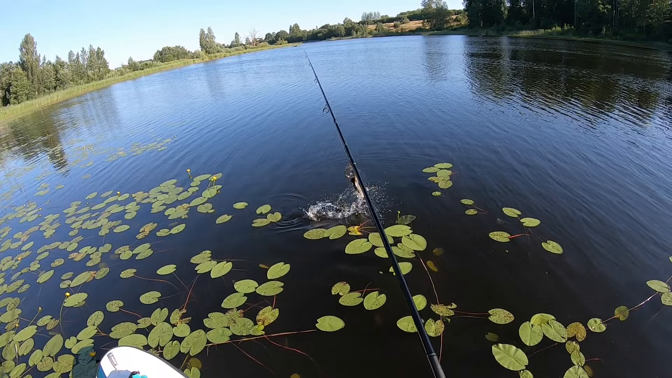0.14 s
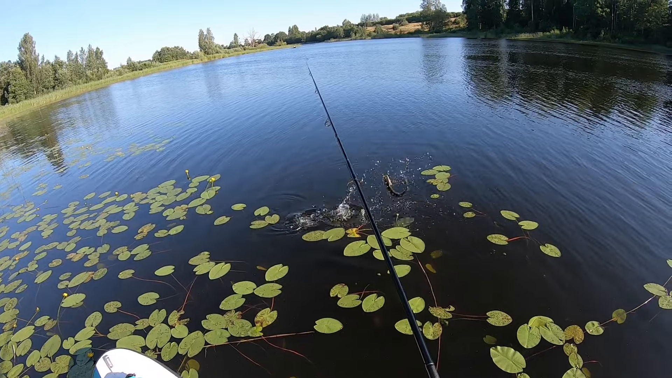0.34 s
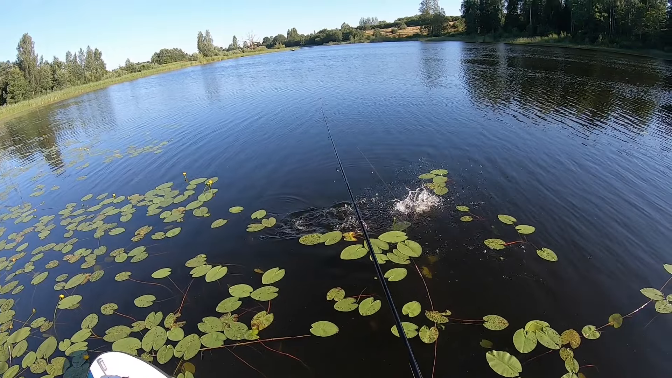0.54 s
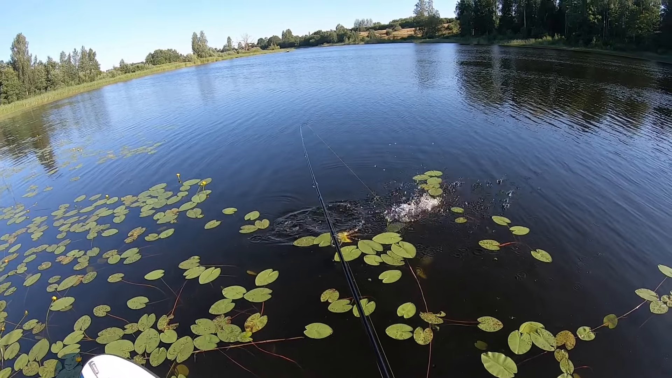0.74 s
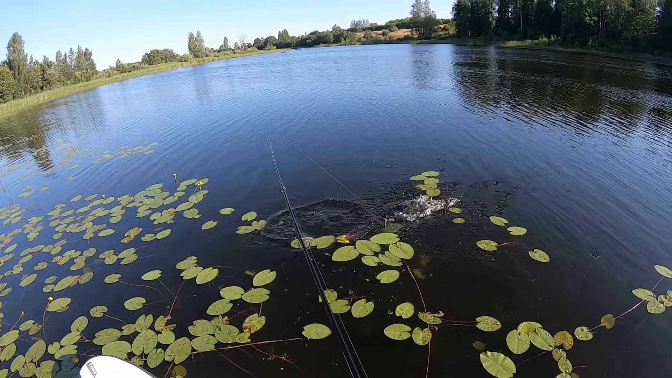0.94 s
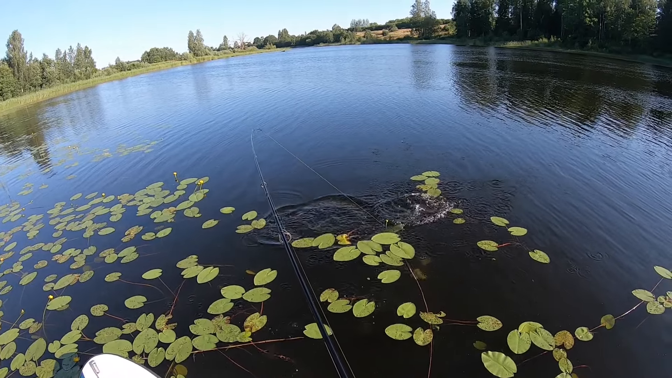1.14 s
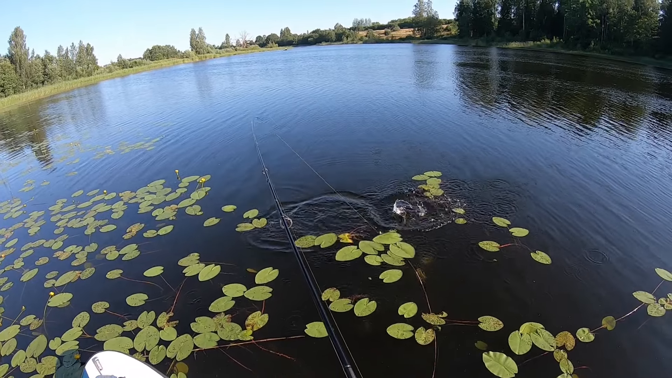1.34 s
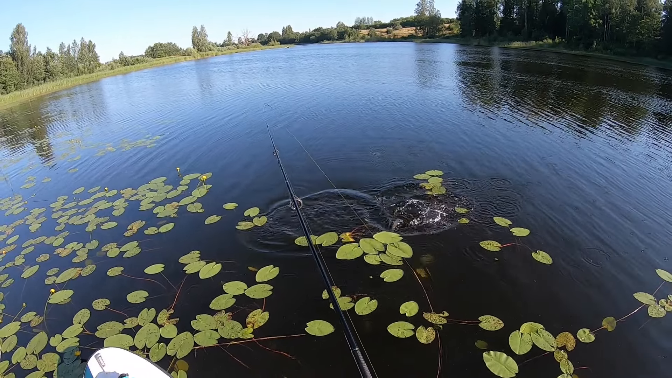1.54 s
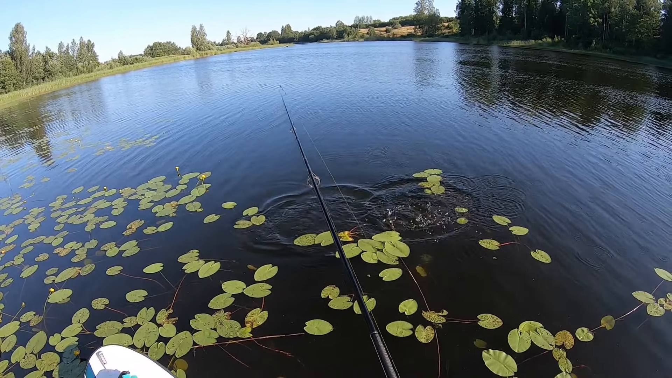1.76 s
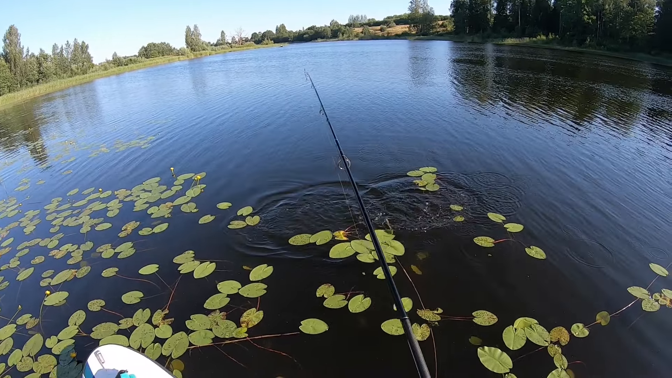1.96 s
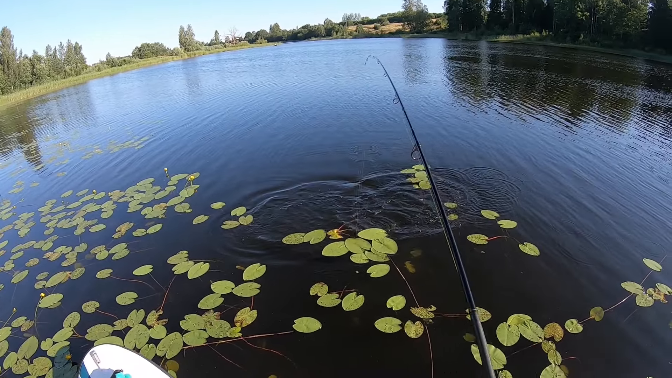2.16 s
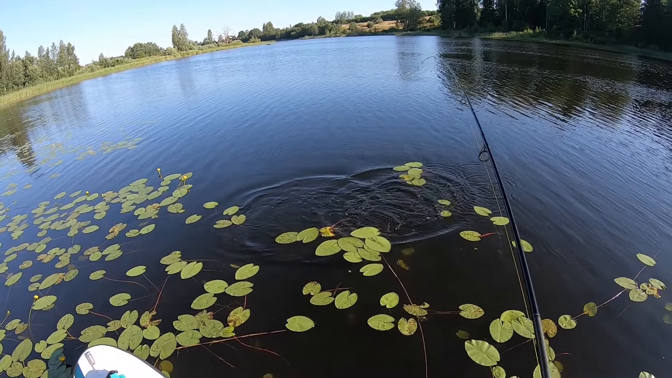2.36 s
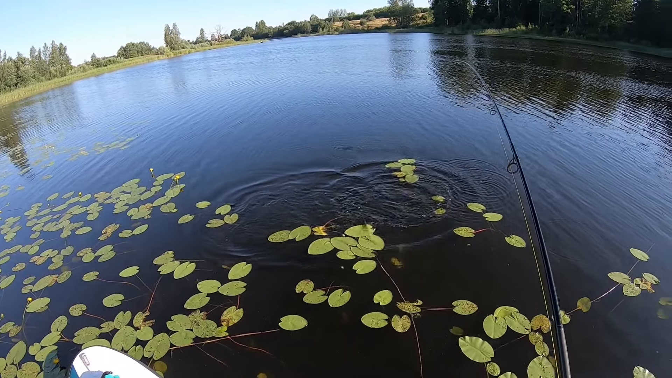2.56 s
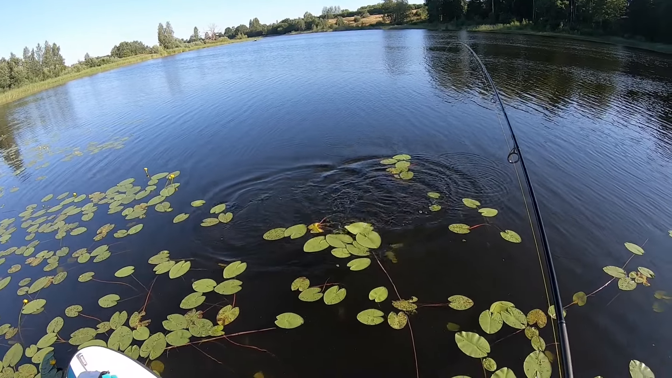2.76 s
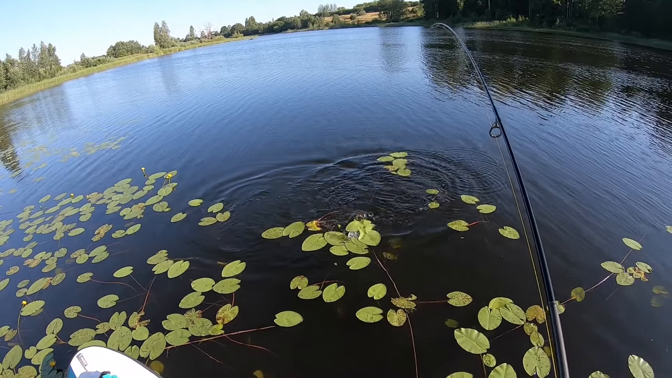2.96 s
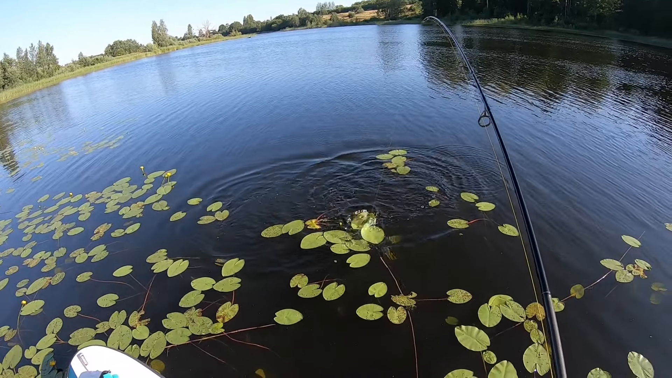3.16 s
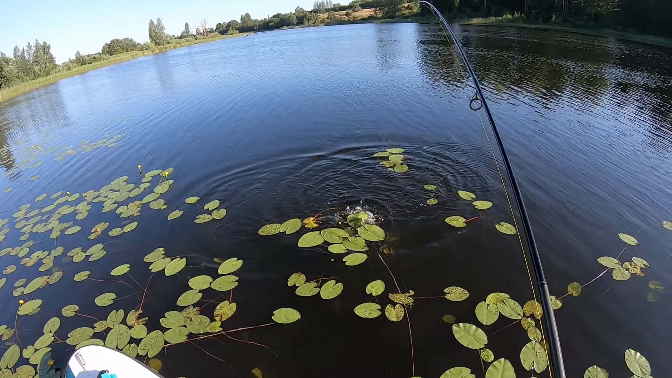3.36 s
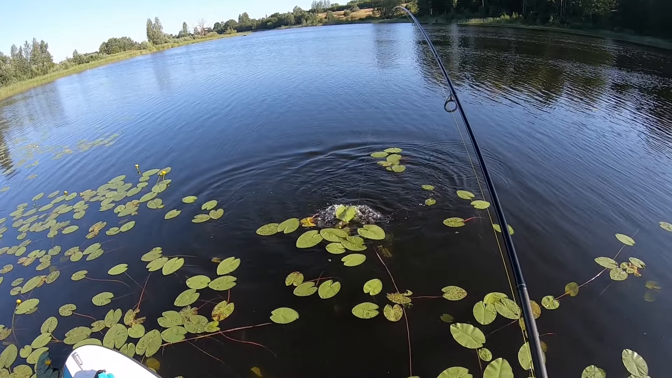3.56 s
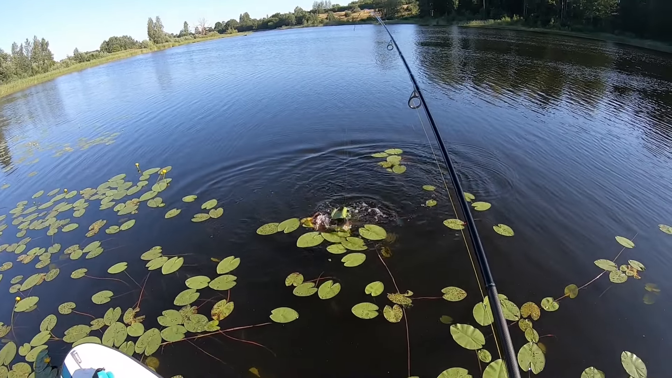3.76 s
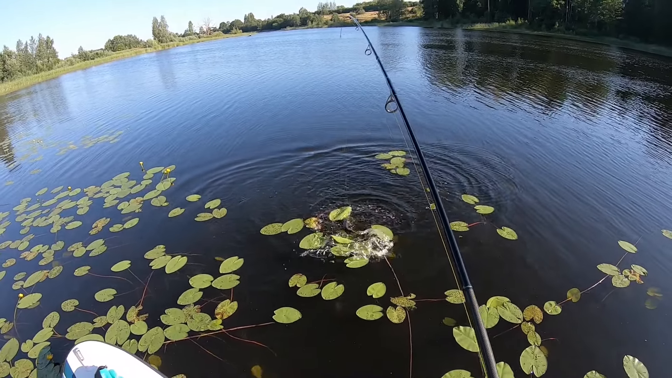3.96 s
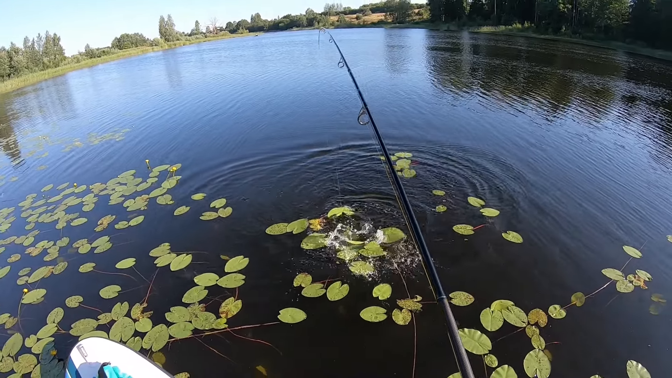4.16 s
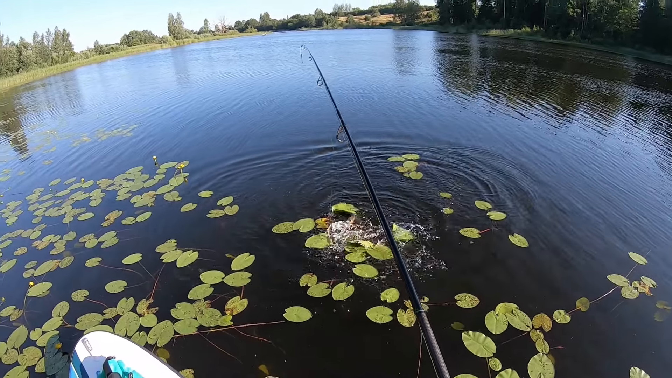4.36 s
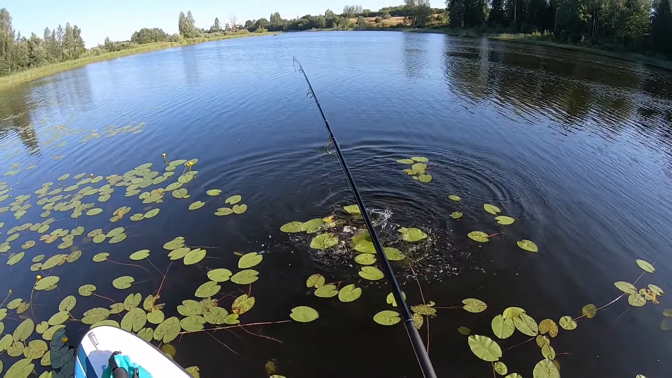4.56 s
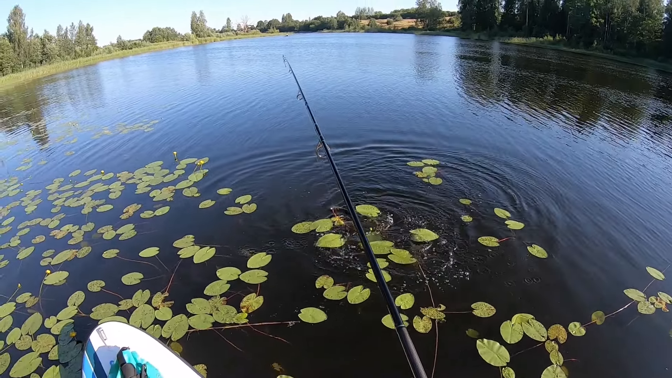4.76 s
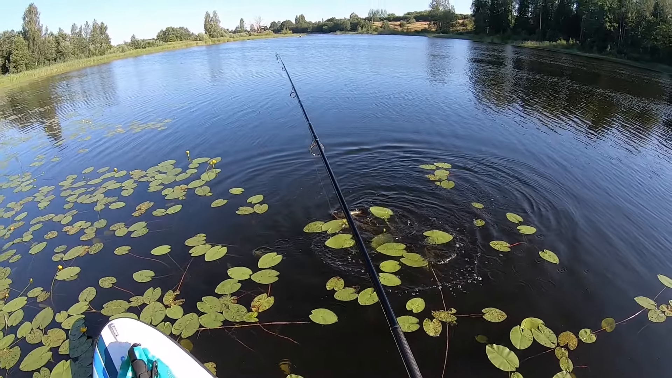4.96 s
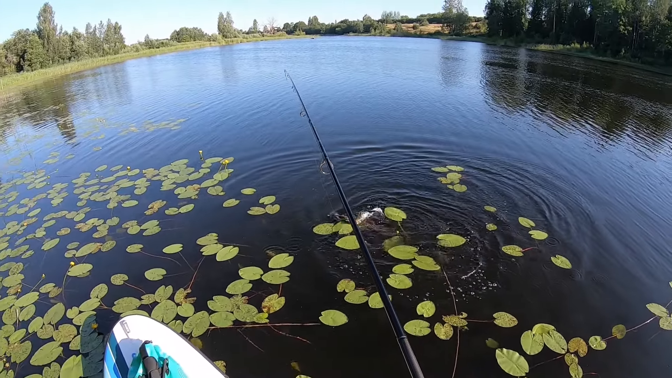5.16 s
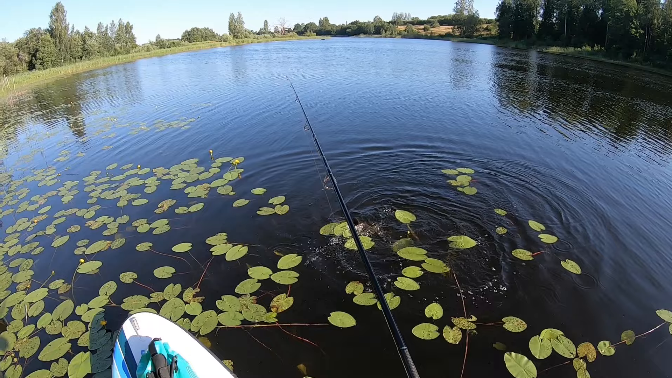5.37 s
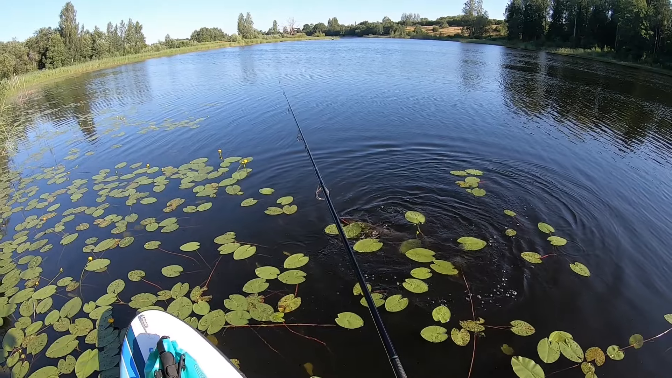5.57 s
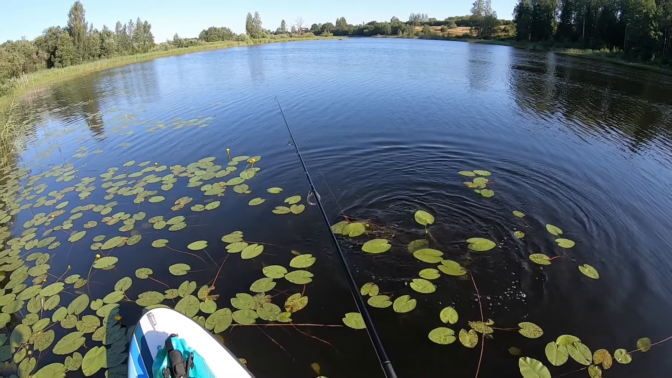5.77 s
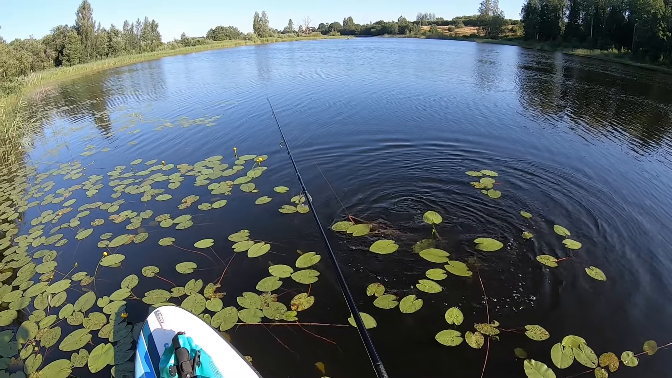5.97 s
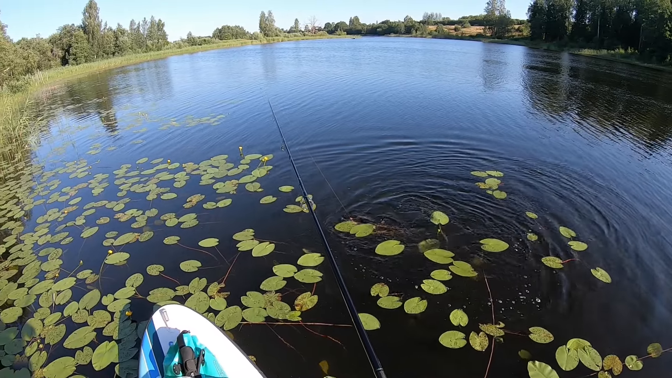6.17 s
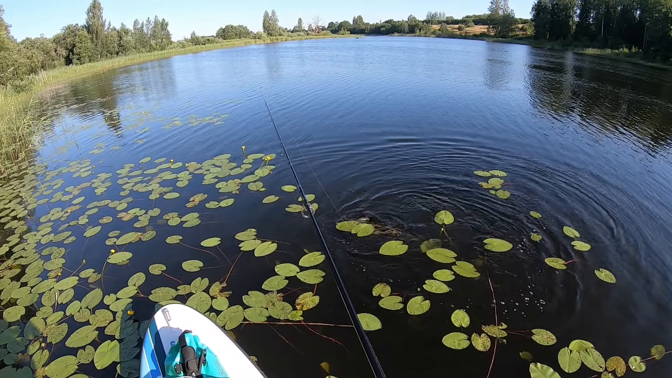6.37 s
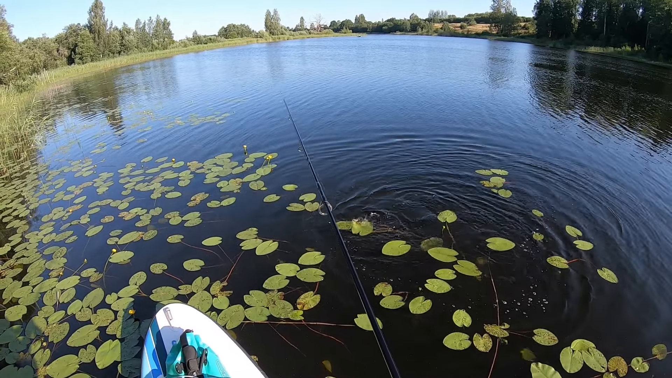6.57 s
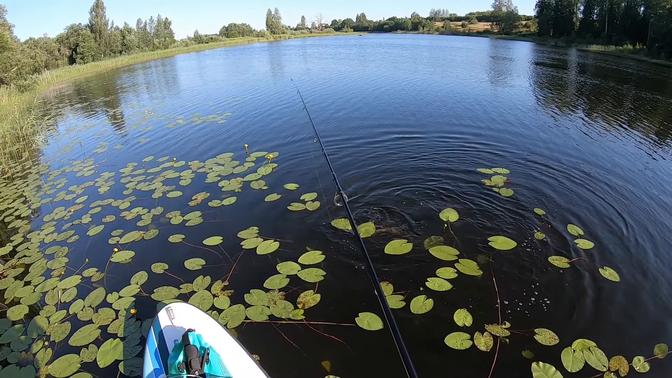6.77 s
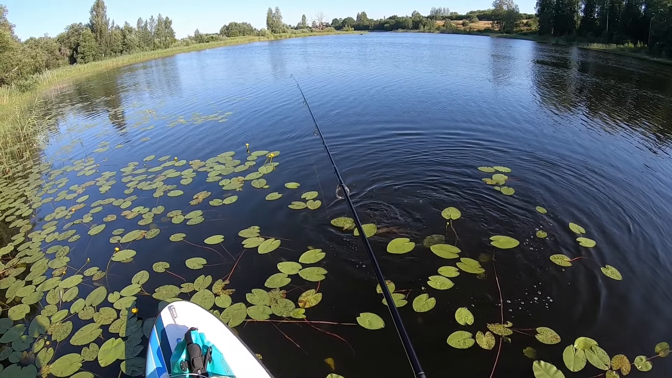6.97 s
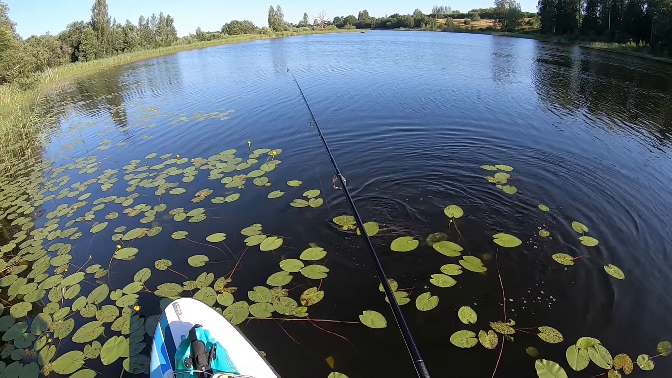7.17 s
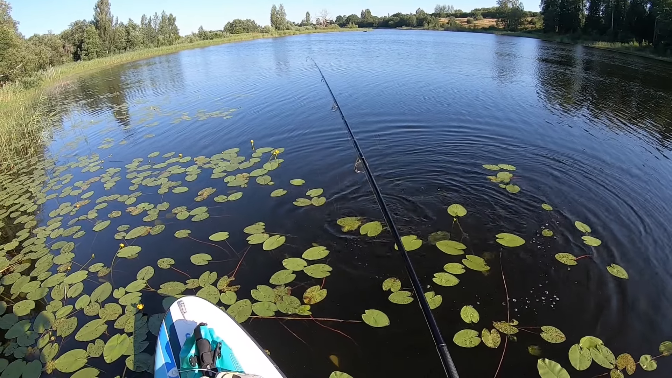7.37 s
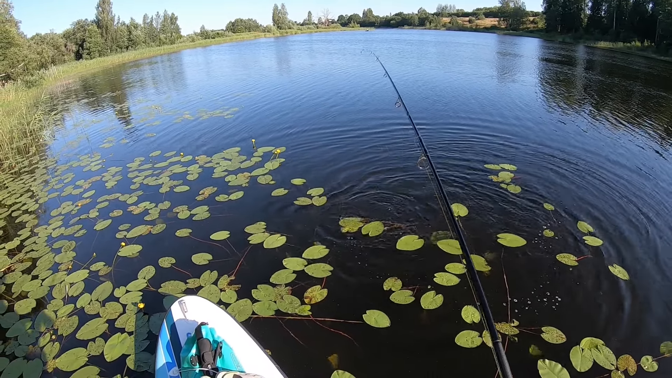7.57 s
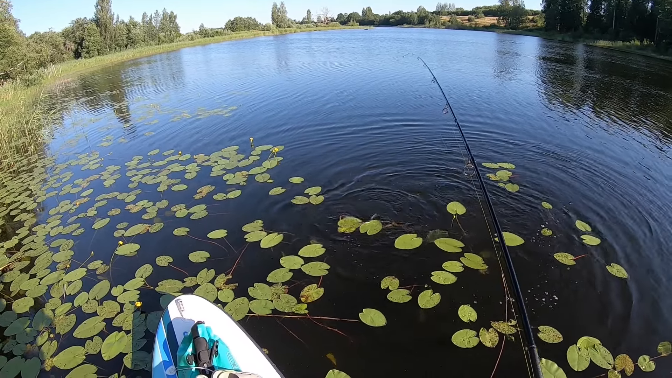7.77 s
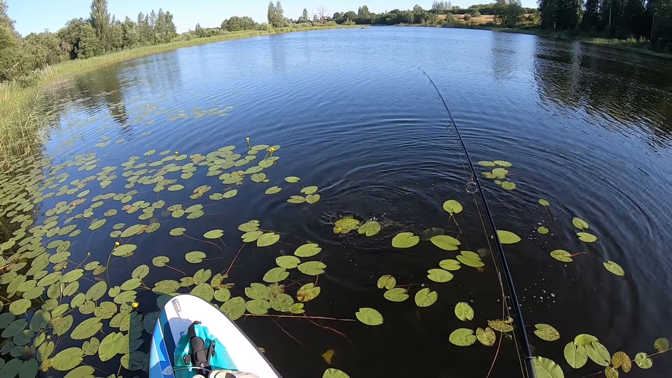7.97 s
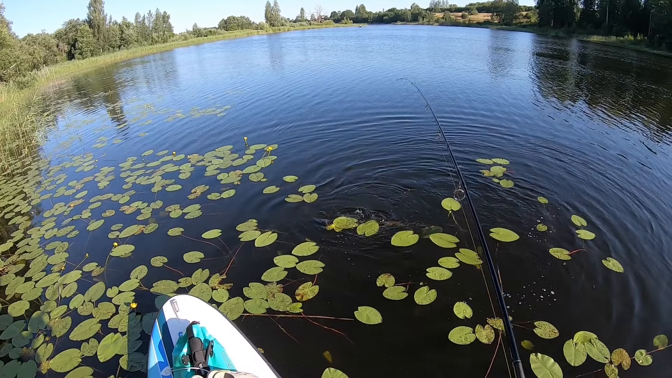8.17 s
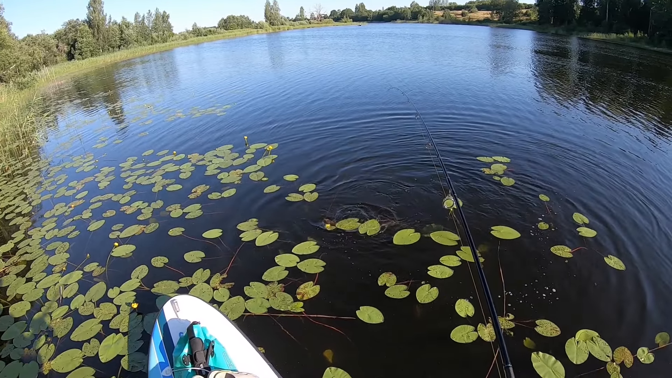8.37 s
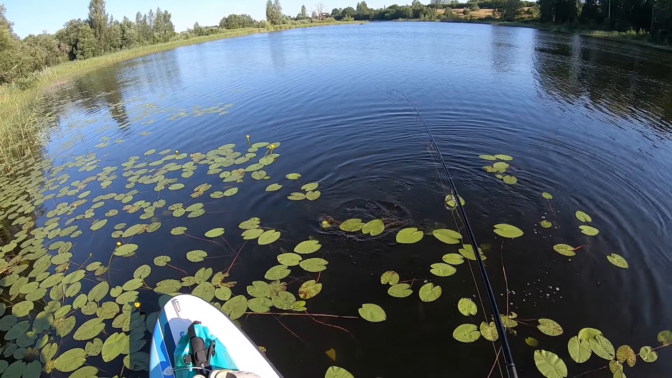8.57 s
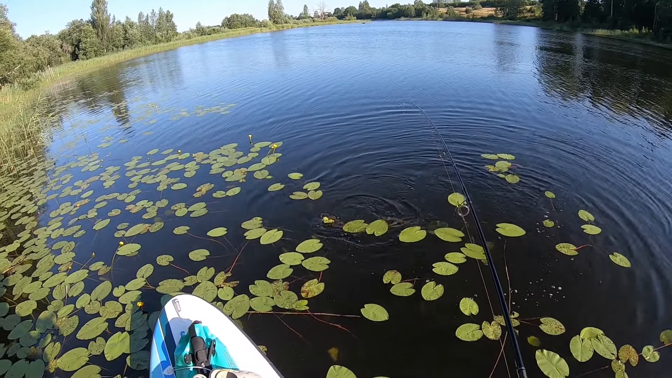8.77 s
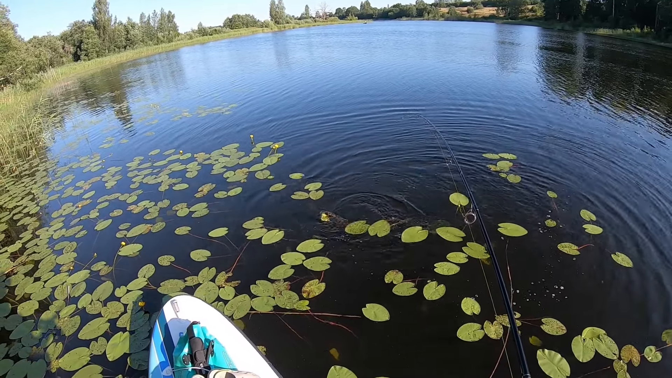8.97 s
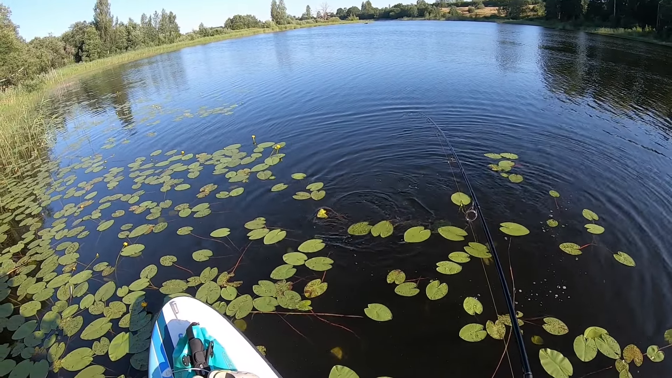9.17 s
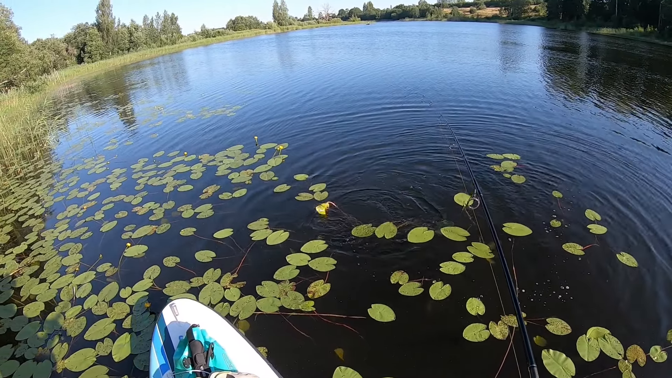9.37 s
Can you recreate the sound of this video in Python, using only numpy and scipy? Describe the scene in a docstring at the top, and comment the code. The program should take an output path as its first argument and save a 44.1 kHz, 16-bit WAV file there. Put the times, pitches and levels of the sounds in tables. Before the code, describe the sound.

Splashing starts almost immediately: rapid wet slaps at 0.1-0.3 s as a fish leaps, with low thuds and buffeting, then the loudest, a sharp cracking smack at about 0.56 s and a hollower slap at 0.74 s. Churning, gulping bubbles and pattering spray thin into drips by 1.8 s. A soft swish and faint far-off bird-like whistles fill the lull from 2 to 2.9 s. Thrashing resumes around 3-3.7 s, duller and gurgling, then swells again at 3.9-4.7 s with a deep gulp and bright spray at 4.1 s and slaps near 4.4 s. A short plop and ringing drip come at 5.16 s, fading by 5.6 s. Afterwards it is nearly quiet: a gentle swish at 6.3 s, tiny drips near 6.65 s, a small plop around 7.9-8.2 s, a distant whistle at 9 s and barely audible drips after. A faint wavering low hum and open air lie beneath, with slight lake reverberation.

```python
"""Hooked fish among lily pads

A hooked fish leaps and thrashes on a calm lake, a few metres from a two-port camera worn by the angler.
Its body smacks the water as damped cavities and noise bursts; trapped air gulps and gurgles as gliding rings.
Spray patters back as ticks, tiny bubbles and fizz.
After three bouts come stray drips, a soft swish and a few faint small splashes.
Under it lie a low hum of tone and resonances, thin far whistles, open air and low buffeting, all faint."""
import sys
import numpy as np
from scipy import signal
from scipy.fft import rfft, irfft, next_fast_len
from scipy.io import wavfile
from scipy.ndimage import uniform_filter1d

SR = 44100
rng = np.random.default_rng(int(sys.argv[2]) if len(sys.argv) > 2 else 0)


def transcribe(u):
    """Save the signal u as a 16-bit wav file named by the first command-line argument.

    u: samples, shape (n,) or (channels, n), limited to [-1, 1]; the rate is SR.
    q: integer samples, one column per channel.
    """
    v = np.clip(np.atleast_2d(u).T, -1, 1)
    q = np.round(v * 32767).astype(np.int16)
    wavfile.write(sys.argv[1], SR, q)


N = 415422  # length in samples


def amp(db):
    """Decibels to gain."""
    return 10 ** (np.asarray(db) / 20)


def unit(x):
    """Scales to rms 1."""
    return x / np.sqrt(np.mean(x ** 2) + 1e-20)


def read(points, hz, axis=1):
    """Reads one column of a table over log frequency."""
    columns = np.transpose(points)
    return np.interp(np.log(hz + 1), np.log(columns[0] + 1), columns[axis])


def shape(x, gain):
    """Filters by a gain given as a function of frequency."""
    size = next_fast_len(x.shape[-1] + 4096)
    spectrum = rfft(x, size) * gain(np.fft.rfftfreq(size, 1 / SR))
    return irfft(spectrum, size)[..., :x.shape[-1]]


def colour(x, spectrum):
    """Gives x a spectrum, at rms 1."""
    return unit(shape(x, lambda hz: amp(read(spectrum, hz))))


def add(mix, s, sound):
    """Mixes a sound in at time s."""
    part = mix[max(round(s * SR), 0):][:len(sound)]
    part += sound[:len(part)]


def ring(size, hz, width):
    """Noise in one resonance, at rms 1."""
    return unit(shape(rng.standard_normal(size), lambda f: 1 / (1 + (2 * (f - hz) / width) ** 2)))


def flutter(depth_db, hz):
    """A random gain that wavers up to the given rate, at rms 1."""
    knots = np.arange(0, N + SR, SR / (2 * hz))
    gains = amp(depth_db * rng.standard_normal(len(knots)))
    return unit(np.interp(np.arange(N), knots, gains))


def surge(s, db, build, fade):
    """Gain that builds up by 10 dB per build time to its height at s, then fades by 20 dB per fade time."""
    t = np.arange(N) / SR - s
    slope_db = np.where(t < 0, 10 * t / abs(build), -20 * t / abs(fade))
    return amp(db + np.maximum(slope_db, -200))


def bubble(first_hz, last_hz, length, swell, fade_db=30, bend=1):
    """A ringing air pocket of gliding pitch; a bend above 1 holds the ring, then ends it faster."""
    u = np.arange(int(2 * length * SR) + 2) / (length * SR)  # time in lengths
    turns = np.cumsum(first_hz + (last_hz - first_hz) * u) / SR
    onset = np.minimum(u / max(swell, 1e-3), 1)
    decay = amp(-fade_db * np.maximum(u - swell, 0) ** bend)
    return np.sin(2 * np.pi * turns) * onset * decay


# an air pocket that changes pitch more also swells for longer: shares of its length, fixed and per unit of climb
SWELL, SWELL_PER_CLIMB = 0.1, 0.42


def swarm(share, low_hz, high_hz, per_s, cycles, spread_db, rise, count=240):
    """Bubbles of many sizes at random moments, at even power; a smaller share makes each stand out more."""
    pitches = np.geomspace(low_hz, high_hz, count)
    kinds = []
    for hz, (life, climb) in zip(pitches, rng.random((count, 2)) ** 2):
        length = cycles * (0.45 + 1.45 * life) / hz
        swell = .06 + SWELL_PER_CLIMB * rise * climb
        kinds.append(hz * bubble(hz, hz * (1 + rise * climb), length, swell))
    draws = rng.random((int(per_s * N / SR), 5))
    sounding = draws[:, -1] < share[(draws[:, 0] * N).astype(int)]
    when, kind, size, side, _ = draws[sounding].T
    strengths = amp(spread_db * np.minimum(-np.log(1 - size), 3)) * np.sign(side - .5)
    out = np.zeros(N)
    for s, k, strength in zip((when * N / SR).tolist(), (kind * count).astype(int), strengths):
        add(out, s, strength * kinds[k])
    return unit(out / np.sqrt(share))


def clumps(x, depth_db=2.5):
    """Each handful of drops has its own colour: random patches about 30 ms long and 900 Hz wide."""
    z = signal.stft(x, nperseg=256)[2]
    patches = uniform_filter1d(rng.standard_normal(z.shape), size=5, axis=0)
    patches = unit(uniform_filter1d(patches, size=10, axis=1))
    return unit(signal.istft(z * amp(depth_db * patches))[1][:len(x)])


# level of the low drone over time: start_s, level_db
HUM_LEVELS = [(0, -62.5), (1.75, -73.5), (2.2, -62.5), (2.8, -69), (4.6, -68.5), (6.9, -61), (8.5, -66.5),
              (9.42, -62.5)]
# weak resonances round the drone's tone: pitch_hz, width_hz, level_db against the tone
HUM_RESONANCES = [(174, 44, -3.5), (329, 75, -10.5), (802, 120, -23)]


def hum(tone_hz=185.5, drift_hz=2):
    """A faint low drone: one even tone of wavering pitch (drift in Hz rms) among weak resonances."""
    tone = unit(np.sin(2 * np.pi * np.cumsum(tone_hz + drift_hz * ring(N, 0, 10)) / SR))
    drone = unit(tone + sum(amp(db) * ring(N, hz, width) for hz, width, db in HUM_RESONANCES))
    level = amp(np.interp(np.arange(N) / SR, *np.transpose(HUM_LEVELS)))
    return level * drone * flutter(depth_db=1.1, hz=2.5)


# colour of the open air before the low dip: pitch_hz, level_db
AIR_COLOUR = [(12, -37), (20, 1.5), (40, -10.5), (61, -12.5), (76, -57), (109, -37.5), (185, -2.5),
              (219, -11.5), (315, -17.5), (427, -23), (560, -28.5), (788, -21.5), (1040, -27),
              (4430, -35.5), (6300, -42), (8200, -46), (10000, -49.5), (15500, -63)]


def air(level_db=-70, dip_db=-7):
    """Quiet open air: noise partly shared by both ports, levelled above 500 Hz, then dipped in the lows."""
    noise = rng.standard_normal(N) + rng.standard_normal((2, N))
    noise = colour(noise, AIR_COLOUR) * flutter(depth_db=2.5, hz=1.1)
    upper = shape(noise.mean(0), lambda hz: hz > 500)
    dipped = shape(noise, lambda hz: amp(dip_db / (1 + (hz / 300) ** 4)))
    return amp(level_db) / upper.std() * dipped


# gusts on the microphones, before the gain: start_s (at the height), level_db, build_s (10 dB), fade_s (20 dB)
GUST_TABLE = [(.24, -41, 0.042, 0.67), (.58, -38.5, 0.06, 0.23), (1.85, -55, 1, 2.2), (4.6, -52, .06, 0.22)]


def buffet(gain_db=3.0, breeze_db=-65, apart=0.45):
    """Air pushes the two ports mostly in opposite directions: gusts over a steady breeze, added in power."""
    push = rng.standard_normal(N) * np.array([[1], [-1]]) + apart * rng.standard_normal((2, N))
    force = np.sqrt(amp(breeze_db) ** 2 + sum(surge(*row) ** 2 for row in GUST_TABLE))
    force = force * flutter(depth_db=3.5, hz=7)
    rumble = [(8, -6.5), (25, 7), (45, -3.5), (90, -17.5), (160, -25.5), (400, -45), (1500, -64.0)]  # Hz, dB
    return amp(gain_db) * force * colour(push, rumble)


# strokes of the fish's body and tail, before the gains of churn and spray; the sign of a time is ignored:
# start_s (at the height), churn_db, spray_db, build_s (10 dB), fade_s (20 dB)
STROKE_TABLE = [(.075, -66.5, -58, -1.1, 0.3), (.14, -43.5, -37.5, 0, 0.15),
                (0.248, -41.5, -42, 0.07, 0.28), (.42, -50.5, -50.5, -0.11, 0.4),
                (0.53, -35, -36.5, 0.05, 0.263), (.725, -44.5, -43, 0.02, 0.42),
                (0.821, -50, -48.5, .005, 0.29), (1.01, -49, -48, 0.04, 0.37),
                (1.13, -52, -58, -0.27, 0.24), (1.339, -55.5, -56, 0.2, 0.54),
                (1.702, -58.5, -48, 0.21, 0.31), (2.975, -50, -46, 0.03, 0.1),
                (3.11, -43, -46, 0.0866, -0.04), (3.19, -42, -46.5, 0.06, 0.33),
                (3.458, -44, -46.5, 0.0544, 0.32), (3.575, -48.5, -50.5, 0, 0.4),
                (3.645, -46.5, -53, 0.09, -0.02), (3.94, -50, -47, 0.13, 0.3),
                (4.104, -42.5, -37.5, 0.1023, 0.2169), (4.239, -47, -45.5, 0.0452, 0.4147),
                (4.392, -53, -39, 0.035, 0.3872), (4.702, -51, -51, 0.01, 0.18),
                (5.169, -46.5, -46.5, 0.0459, 0.15), (5.351, -70.5, -49, 0.15, 0.2748),
                (5.531, -52.5, -59.5, 0.04, 0.1), (6.66, -66.5, -62.5, 0.17, 0.3),
                (8.03, -73, -63.5, -0.12, 0.38)]


def agitation(settle_db=-19.5, settle_s=0.6):
    """How hard water is churned and how much spray flies: strokes add in power, each settling slowly."""
    power = np.zeros((2, N))
    for s, churn_db, spray_db, build, fade in STROKE_TABLE:
        motion = np.maximum(surge(s, 0, build, fade), surge(s, settle_db, build, settle_s))
        power += (amp([[churn_db], [spray_db]]) * motion) ** 2
    return np.sqrt(power)


def busy(strength, full_db=-42.5, fewest=.15):
    """Share of drops and bubbles that sound at each moment: calmer water makes fewer, down to a least share."""
    return np.clip(strength / amp(full_db), fewest, 1)


# colour of the folded water: pitch_hz, level_db
CHURN_COLOUR = [(100, -22), (250, -5.5), (450, -2), (900, 1.5), (1300, -3), (1800, -8), (3000, -39)]


def churn(effort, gain_db=-2, wash_db=-5):
    """Water folded over by the fish: large rising bubbles in a soft wash."""
    bubbles = swarm(np.sqrt(busy(effort)), 240.8, 1881, per_s=600, cycles=12, spread_db=3, rise=0.4)
    wash = amp(wash_db) * rng.standard_normal(N) * flutter(depth_db=5.0, hz=60.4)
    return amp(gain_db) * effort * colour(bubbles + wash, CHURN_COLOUR)


# colour of thrown water, also used for splatter and drop ticks: pitch_hz, level_db
SPRAY_COLOUR = [(150, -29), (600, -12), (1100, -0.5), (1550, -4), (1950, -4), (2700, -0.5), (3500, 0),
                (4500, -7), (5400, -12), (6400, -10.5), (7300, -17), (8000, -17), (8900, -12.5),
                (9900, -15.5), (11300, -24), (13500, -28.5), (16000, -48)]


def spray(thrown, gain_db=-1.5, ticks_per_s=700, tick_db=-1, fizz_db=-7.5, fizz_hz=7000):
    """Thrown water patters back as clumps of ticks and tiny ringing bubbles; the finest merge into fizz."""
    share = busy(thrown)
    bubbles = swarm(share, 900, 11000, per_s=2600, cycles=15, spread_db=3.6, rise=0.42)
    struck = rng.random(N) < share * ticks_per_s / SR
    strengths = amp(3 * np.minimum(rng.exponential(1, N), 3))
    ticks = struck * rng.choice([-1, 1], N) * strengths
    drops = unit(bubbles + amp(tick_db) * unit(ticks / np.sqrt(share)))
    # above fizz_hz single drops give way to noise
    drops = shape(drops, lambda hz: 1 / np.hypot(1, (hz / fizz_hz) ** 2))
    fizz = shape(rng.standard_normal(N), lambda hz: 1 - (1 - amp(fizz_db)) / (1 + (hz / fizz_hz) ** 4))
    patter = clumps(colour(drops + fizz, SPRAY_COLOUR))
    return amp(gain_db) * thrown * patter * flutter(depth_db=2.0, hz=76.8)


# body, tail and leaves hitting the water: start_s, level_db (of the thump), pitch_hz (of the cavity),
# burst_db (splatter and slosh, before their own gains), length_s (the burst fades 20 dB in this time)
SMACK_TABLE = [(0.086, -37, 3180, -36, 0.0044), (0.138, -26, 1840, -35, 0.046),
               (0.202, -27, 1500, -31.5, 0.0077), (.244, -31, 3050, -27.5, 0.0074),
               (0.318, -45, 1700, -41, 0.0099), (.408, -46, 3220, -40.5, 0.0034),
               (0.494, -34, 3170, -41.5, 0.035), (0.536, -31.5, 2800, -39.5, .016),
               (0.5602, -10.5, 2970, -24, 0.0028), (0.699, -35, 1880, -37, 0.011),
               (0.74, -20, 595, -37, 0.0067), (3.1072, -25.5, 1347, -38, 0.029),
               (3.1784, -35, 720, -45, 0.069), (3.446, -52, 900, -37, 0.079),
               (3.833, -31, 2500, -44.5, 0.042), (4.1, -39, 1330, -33, 0.014),
               (4.377, -33, 1270, -31, 0.008), (4.386, -23.5, 2960, -40, 0.043),
               (5.1593, -29, 2200, -34.5, 0.011), (5.27, -45, 2740, -42, 0.04),
               (6.648, -62, 4930, -56.5, 0.0065), (7.9764, -44.5, 2100, -46.5, .018),
               (7.987, -36, 1480, -46, 0.035), (8.03, -60, 1330, -48.5, 0.029),
               (9.302, -57, 1900, -54.5, 0.031), (9.338, -58, 2400, -59, 0.043)]


def smacks(cycles=5, slosh_db=-3, build=.14, sharp_hz=2400, overtone=2.5, overtone_db=-9,
           bright_hz=17000, firm_db=-38, lowest=0.21):
    """Blows thump a damped cavity amid slosh; high-pitched ones splatter more, weak bursts are duller."""
    out = np.zeros(N)
    for s, db, hz, burst_db, length in SMACK_TABLE:
        sharpness, upper_hz = hz / sharp_hz, hz * overtone
        add(out, s, amp(db) * bubble(hz, hz, cycles / hz, 0.12))
        upper = bubble(upper_hz, upper_hz, cycles / hz, 0.075)
        add(out, s, amp(overtone_db + db) * sharpness * upper)
        u = np.arange(SR // 4) / (length * SR)
        burst = np.minimum(u / build, 1) * amp(burst_db - 20 * (u - build))
        edge_hz = bright_hz * amp(burst_db - firm_db)
        splatter = clumps(colour(rng.standard_normal(len(u)), SPRAY_COLOUR))
        splatter = shape(splatter, lambda f: 1 / np.sqrt(1 + (f / edge_hz) ** 4))
        slosh = shape(ring(len(u), hz, hz), lambda f: 1 - 1 / (1 + (f / (lowest * hz)) ** 4))
        add(out, s - build * length / 2, burst * (sharpness * splatter + amp(slosh_db) * slosh))
    return out


# big air pockets, before gain and roughness: start_s, level_db, pitch_hz (at first), length_s,
# climb (share by which the pitch rises over one length; below 0 it sinks)
GULP_TABLE = [(0.122, -30, 1760, .012, -0.11), (0.131, -20.5, 1610, 0.012, 0.001),
              (0.235, -29.5, 420, 0.015, 0.17), (0.243, -25.5, 1250, 0.015, -0.0048),
              (0.28, -25.5, 960, 0.023, 0.027), (0.39, -37.5, 804, 0.029, 0.078),
              (0.644, -29.5, 430, 0.029, 0.017), (0.736, -28.5, 317, 0.021, -0.15),
              (0.79, -39, 259, 0.047, 0.26), (0.802, -41.5, 457, 0.042, 0.53),
              (0.815, -40, 670, 0.036, 0.26), (0.853, -38, 689, 0.039, 0.54),
              (0.987, -40.5, 747, 0.043, 0.036), (1.004, -36.5, 1600, 0.0086, 0.12),
              (1.028, -40, 2330, 0.013, .55), (1.052, -43, 2500, .008, .35), (1.08, -40, 940, 0.024, 0.18),
              (1.123, -45.5, 545, 0.039, 0.19), (1.131, -42.5, 826, 0.031, 0.18),
              (1.24, -44, 1220, .013, 0.56), (1.283, -38.5, 1150, 0.015, -0.065),
              (1.304, -40.5, 915, 0.027, 0.31), (1.383, -41, 1240, 0.015, -0.016),
              (1.468, -38.5, 785, 0.029, 0.43), (1.485, -30.5, 1140, 0.011, 0.12),
              (1.524, -40.5, 850, 0.014, 0.082), (1.666, -41.5, 740, 0.034, 0.36),
              (1.734, -42, 1530, 0.0098, -0.078), (1.781, -44, 927, 0.031, -0.026),
              (1.792, -50.5, 1320, 0.022, 0.57), (2.934, -38, 448, 0.046, 0.42),
              (2.982, -31.5, 860, 0.0084, 0.2), (3.072, -34.5, 490, 0.016, 0.05),
              (3.181, -30, 418, 0.029, 0.24), (3.231, -36, 335, 0.018, 0.15),
              (3.257, -31, 1470, 0.0072, 0.00092), (3.387, -40.5, 333, 0.058, 0.43),
              (3.503, -30.5, 457, 0.023, 0.13), (3.631, -40, 390, 0.036, 0.13),
              (3.916, -31.5, 500, 0.022, 0.8), (3.929, -35, 473, 0.02, 0.24),
              (3.94, -35, 1240, 0.021, 0.29), (4.097, -19, 665, 0.018, 0.21),
              (4.129, -24, 508, 0.021, -0.1), (4.217, -30, 1007, 0.013, .03), (4.239, -38, 522, 0.032, 0.3),
              (4.241, -28.5, 1580, 0.0083, 0.019), (4.462, -31, 1090, 0.0082, 0.091),
              (4.576, -31.5, 900, .008, 0.22), (4.665, -41, 514, .03, 0.84),
              (4.785, -46.5, 1990, 0.017, 0.62), (4.848, -54.5, 985, 0.042, .02),
              (4.973, -54.5, 1720, 0.017, -.12), (5.037, -56, 1220, .024, .1),
              (5.115, -37, 1400, 0.019, -0.46), (5.141, -30, 800, 0.014, 0.085),
              (5.139, -30, 1150, 0.0048, 0.0059), (5.159, -38.5, 341, 0.059, 0.41),
              (5.612, -45.5, 1300, 0.021, 0.71), (6.655, -50, 1970, 0.0092, 0.56),
              (7.902, -40.5, 790, 0.032, 0.27), (7.915, -32, 1085, 0.011, -0.16),
              (7.917, -47, 1700, .016, 0.26), (7.979, -37.5, 1666, 0.016, -0.42),
              (7.989, -44.5, 875, 0.012, 0.06), (8.002, -43.5, 2080, 0.014, 0.16),
              (8.035, -49, 468, 0.028, -0.15), (8.087, -54.5, 805, 0.024, 0.19),
              (8.225, -49, 1940, 0.0083, 0.11)]


def gulps(gain_db=-1, rough=0.14, overtone=2.4, overtone_db=-15):
    """Big air pockets glide in pitch, shaken by moving water; a wide glide adds a stronger ragged overtone."""
    out = np.zeros(N)
    for s, db, hz, length, climb in GULP_TABLE:
        swell = abs(SWELL + SWELL_PER_CLIMB * abs(climb))
        add(out, s, amp(db) * bubble(hz, hz * (1 + climb), length, swell, bend=1.17))
        upper = bubble(hz * overtone, hz * overtone * (1 + climb), length, 2 * swell)
        ragged = upper * ring(len(upper), 0, hz / 2)
        add(out, s, amp(db + overtone_db) * np.sqrt(abs(climb)) * ragged)
    return amp(gain_db) * out * (1 + rough * ring(N, 0, 400))


# deep shoves of the fish's weight: start_s (at the height), level_db
SHOVE_TABLE = [(.24, -46.5), (.58, -46)]


def thuds(build_s=0.082, fade_s=0.096):
    """The fish's weight shoves the water as it leaps and as it falls back: surges of low resonant noise."""
    return sum(surge(s, db, build_s, fade_s) for s, db in SHOVE_TABLE) * ring(N, 197, 184)


# the drops that stand out, and the high ring of the crack at 0.56 s: start_s, level_db, pitch_hz (at first)
DRIP_TABLE = [(.5602, -21.5, 6430), (.625, -29.5, 1740), (0.743, -32.5, 2780), (.825, -33, 2670),
              (.945, -39, 3000), (.979, -36.5, 3040), (1.0814, -33.5, 2800), (1.33, -39, 2870),
              (1.4051, -30.5, 3170), (1.44, -37, 3720), (1.4681, -28.5, 3320), (1.565, -40, 2050),
              (1.6285, -34.5, 2510), (1.687, -36, 2900), (1.715, -35.5, 2800), (1.752, -38.5, 3480),
              (1.82, -42.5, 2420), (2.3364, -48.5, 2960), (2.5664, -51, 2720), (2.8774, -46.5, 2100),
              (2.915, -40.5, 2430), (2.9846, -34, 3450), (3.11, -28.5, 3330), (3.213, -30.5, 2950),
              (3.3156, -35.5, 3430), (3.4195, -39, 2320), (3.491, -40, 2400), (3.571, -36.5, 3500),
              (3.699, -38, 3520), (3.953, -36, 3660), (3.984, -34.5, 2930), (4.068, -35, 3900),
              (4.07, -30.5, 5530), (4.099, -27, 3740), (4.24, -42, 3300), (4.438, -32, 3220),
              (4.464, -40, 2210), (4.53, -36, 2260), (4.5557, -32, 3100), (4.6244, -32.5, 3660),
              (4.63, -37.5, 2670), (4.657, -36.5, 3350), (4.696, -37, 2150), (4.7046, -36.5, 3000),
              (4.758, -43.5, 3010), (4.847, -47, 2740), (4.93, -45, 2660), (5.019, -48, 2280),
              (5.062, -50, 2810), (5.1655, -23, 2620), (5.254, -38.5, 5500), (5.288, -31, 4600),
              (5.353, -43, 4200), (5.415, -44, 2720), (5.486, -42.5, 3900), (5.522, -43.5, 3500),
              (5.6131, -39.5, 2980), (6.536, -52, 4170), (6.564, -55, 5700), (6.575, -51, 3200),
              (6.589, -58, 2980), (6.619, -49, 6550), (6.649, -47.5, 2310), (6.655, -37.5, 3180),
              (6.692, -54, 4400), (6.773, -55.5, 3430), (6.8169, -49, 3050), (6.817, -50.5, 4900),
              (6.8647, -50.5, 3900), (7.887, -44, 4580), (7.902, -47, 3030), (8.011, -43, 2910),
              (8.219, -42.5, 3200), (9.1045, -53, 2150), (9.114, -51.5, 3150)]


def drips(cycles=18, rise=1.062, tick_db=-11, tick_s=.0025, tick_low_hz=1600, tick_hz=6000,
          overtone_db=-15, overtone=2.0):
    """A drop ticks and rings a small bubble with a smaller one beside it; the crack's high ring is made alike."""
    rings, ticks = np.zeros(N), np.zeros(N)
    t = np.arange(SR // 20) / SR
    for s, db, hz in DRIP_TABLE:
        small_hz = hz * overtone * rng.uniform(0.68, 1.125)
        add(rings, s, amp(db) * bubble(hz, hz * rise, cycles / hz, 0.053))
        small = bubble(small_hz, small_hz * rise, cycles / small_hz, 0.11)
        add(rings, s, amp(db + overtone_db) * small)
        add(ticks, s, amp(db + tick_db) * np.exp(-t / tick_s))
    impacts = ticks * colour(rng.standard_normal(N), SPRAY_COLOUR)
    return rings + shape(impacts, lambda f: f / np.hypot(f, tick_low_hz) / np.hypot(1, f / tick_hz))


# chains of air pockets gurgling up behind the fish:
# start_s, length_s, level_db (rms over the length), first_hz, last_hz
GURGLE_TABLE = [(0.696, 0.029, -44, 740, 626), (0.831, 0.05, -50.5, 596, 910),
                (1.439, 0.077, -57, 480, 577), (3.078, 0.041, -51, 515, 596),
                (3.235, .045, -50.5, 602, 426), (3.24, 0.13, -56.5, 300, 313),
                (3.449, 0.054, -46.5, 1025, 880), (3.527, 0.14, -51.5, 468, 345),
                (3.631, 0.052, -50.5, 523, 1020), (4.333, 0.036, -52, 520, 740),
                (4.486, 0.082, -50, 1090, 1284), (4.69, 0.069, -54.5, 525, 910),
                (5.508, 0.039, -55, 926, 1180)]


def gurgles(per_s=95, cycles=16, rise=0.159, scatter_octaves=0.074, spread_db=3):
    """Pockets break off one after another, each climbing a little, while their size drifts along the chain."""
    out = np.zeros(N)
    for s, length, db, first_hz, last_hz in GURGLE_TABLE:
        count = int(per_s * length) + 1
        chain = np.zeros(SR // 2)
        for k, (late, pitch, size) in enumerate(rng.uniform(-0.99, 1, (count, 3))):
            u = (k + (late + 1) / 4) / count  # place along the chain
            hz = first_hz * (last_hz / first_hz) ** u * 2 ** (scatter_octaves * pitch)
            pocket = bubble(hz, hz * (1 + rise), cycles / hz, 0.176)
            add(chain, u * length, amp(spread_db * size) * pocket)
        add(out, s, amp(db) * chain * np.sqrt(length * SR / np.sum(chain ** 2)))
    return out


# soft rushes with no splash: start_s (at the height), level_db, build_s (10 dB), fade_s (20 dB), pitch_hz
SWISH_TABLE = [(1.92, -60, .12, .2, 900), (2.19, -66, .2, .5, 900), (6.34, -63, .1, .22, 1400)]


def swish(width=1.8):
    """Water slides softly round the fish as it is drawn along: surges of broadly resonant noise."""
    return sum(surge(s, db, build, fade) * ring(N, hz, width * hz)
               for s, db, build, fade, hz in SWISH_TABLE)


# thin whistles from the shore, like a far bird, before they break up:
# start_s, level_db, first_hz, last_hz (after one length), length_s
WHISTLE_TABLE = [(2.055, -72, 3420, 4700, 0.033), (2.158, -66, 3800, 5100, 0.04),
                 (2.266, -64, 3500, 4600, 0.047), (2.859, -65, 3910, 5530, 0.052),
                 (5.737, -69.5, 4000, 4100, 0.12), (8.986, -67.5, 4450, 4420, 0.11)]


def whistles():
    """Faint gliding notes from far away, broken up on their way across the water."""
    out = np.zeros(N)
    for s, db, first_hz, last_hz, length in WHISTLE_TABLE:
        add(out, s, amp(db) * bubble(first_hz, last_hz, length, 0.38, fade_db=14))
    return out * (.6 + .7 * ring(N, 0, 340))


# how the two microphone ports hear the fish: pitch_hz, left_minus_right_db, left_lead_rad
PORT_TABLE = [(200, -2, 0), (480, -7.5, .05), (790, -8.5, 1), (1150, -1.5, 1.25), (1700, 1, .7),
              (2400, -2.5, .2), (4000, -3, .1), (5300, -6, -.1), (6700, -3, .2), (7400, 2, .8),
              (8300, -4, 3.3), (10400, -14, 4.8), (12000, -1.5, 6.2)]


def ports(x):
    """Places a sound ahead of the camera through the level and phase of its two ports."""
    def gains(hz):
        ratio, lead = amp(read(PORT_TABLE, hz)), read(PORT_TABLE, hz, axis=2)
        return np.array([ratio * np.exp(1j * lead), np.ones(len(hz))]) * 2 / (1 + ratio)
    return shape(x, gains)


def scatter(x, gain_db=-4, low_hz=7200, t60=.03, turns_per_s=1.7, count=4):
    """Short waves bounce off the moving angler and the camera body, changing by port and by moment."""
    t = np.arange(SR // 20) / SR
    treble = shape(x, lambda hz: 1 - 1 / (1 + (hz / low_hz) ** 4))
    out = np.zeros((2, N))
    for k in range(count):
        taps = unit(rng.standard_normal((2, len(t))) * amp(-60 * t / t60)) / np.sqrt(len(t))
        turn = np.pi * (k + 1) * turns_per_s * np.arange(N) / SR + k
        share = np.cos(turn) * np.sqrt(2 / count)
        out += signal.oaconvolve((share * treble)[None], taps, axes=1)[:, :N]
    return amp(gain_db) * out


def lake(x, wet_db=-12, t60=0.19, shore_db=-31, shore_t60=0.97):
    """Weak scatter from the board and the ripples, with a fainter, longer wash from the wooded shore."""
    t = np.arange(SR) / SR
    near, far = rng.standard_normal((2, 2, SR))
    ripples = amp(wet_db) * unit(near * amp(-60 * t / t60))
    shore = amp(shore_db) * unit(far * amp(-60 * t / shore_t60))
    return signal.fftconvolve(x[None], (ripples + shore) / np.sqrt(SR), axes=1)[:, :N]


def scene():
    """The splashing, its surroundings and the background, which leans to the right port."""
    background = hum() + air() + buffet() + whistles()
    effort, thrown = agitation()
    water = churn(effort) + spray(thrown) + smacks() + gulps() + thuds() + drips() + gurgles() + swish()
    return ports(water) + scatter(water) + lake(water) + background * amp([[-1.3], [1.3]])


def record(dry):
    """The camera's band limit: a steep low-pass at 15.5 kHz."""
    low_pass = signal.firwin(511, 15500, window=("kaiser", 9), fs=SR)
    return signal.oaconvolve(dry, low_pass[None], "same")


dry = scene()
out = record(dry)
transcribe(out)
```